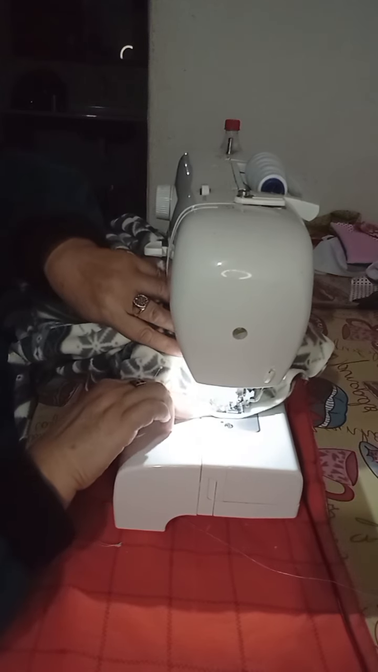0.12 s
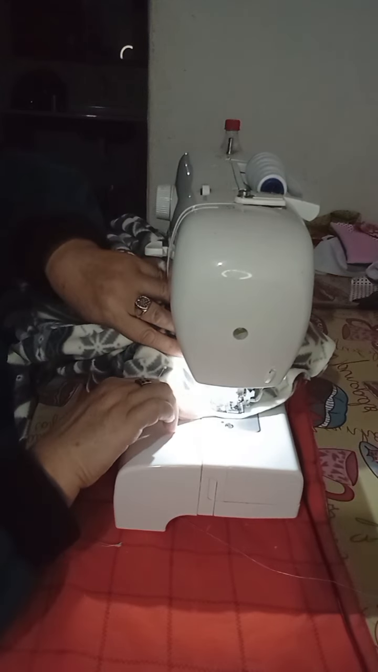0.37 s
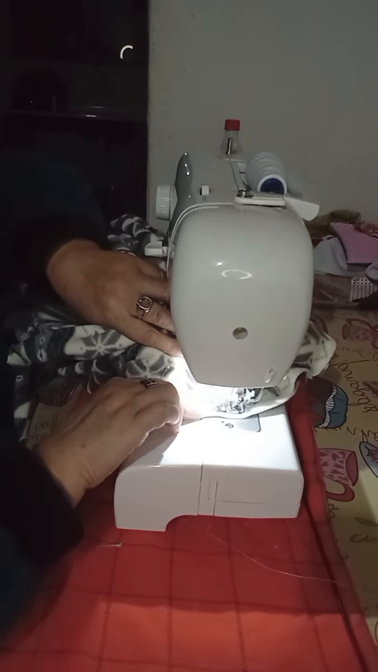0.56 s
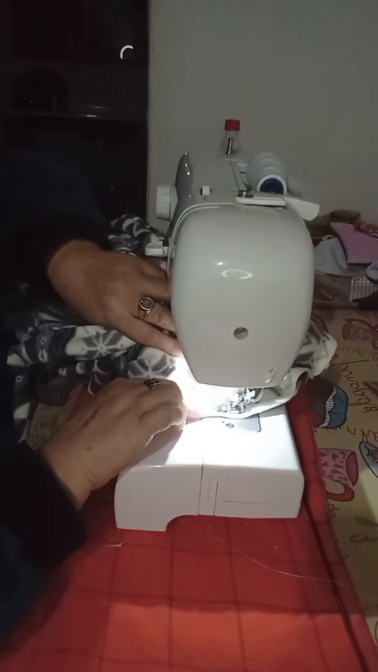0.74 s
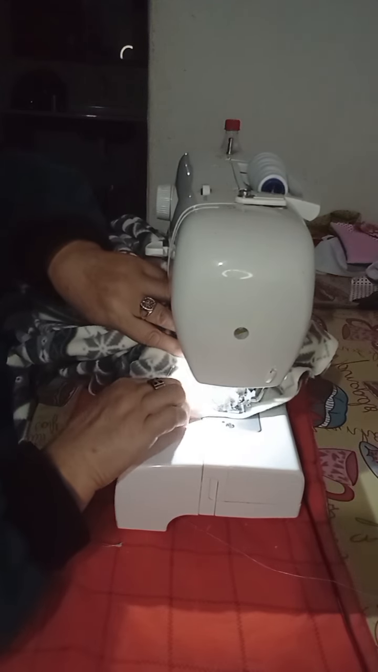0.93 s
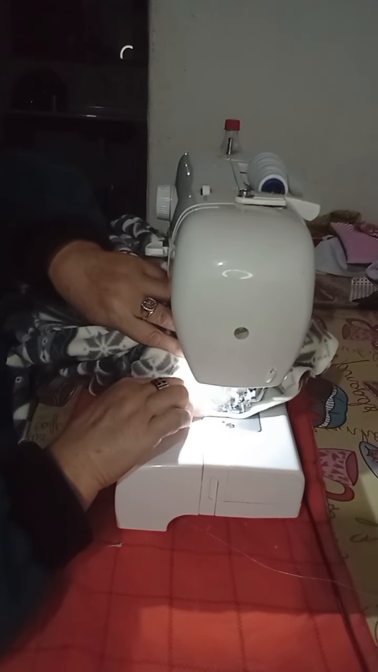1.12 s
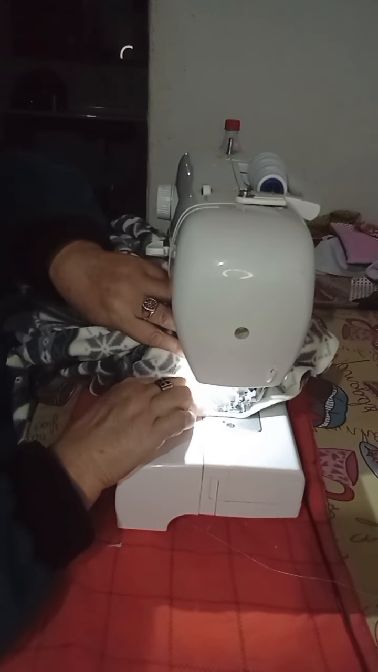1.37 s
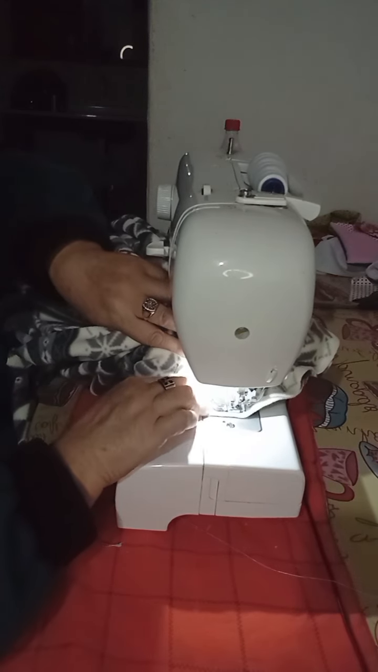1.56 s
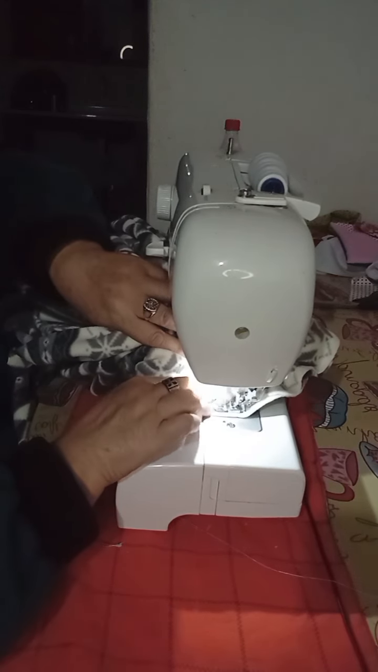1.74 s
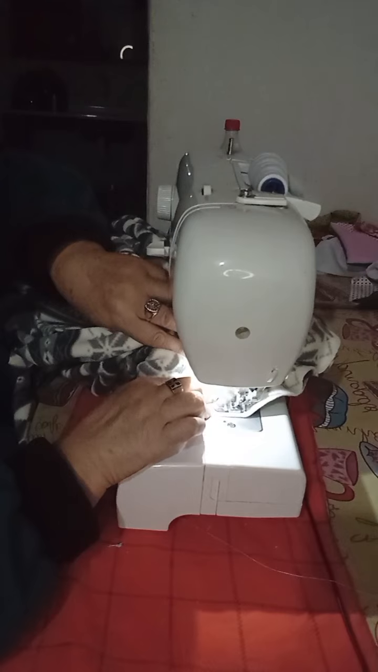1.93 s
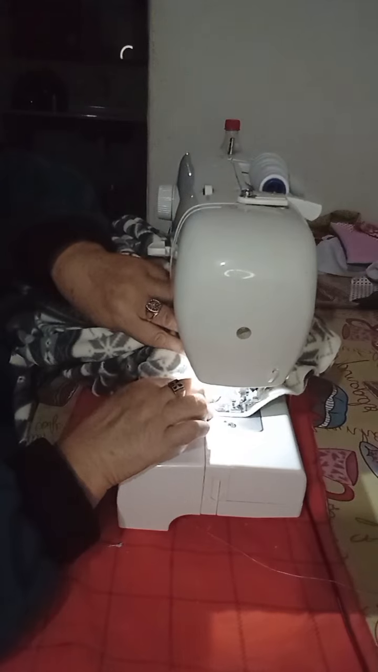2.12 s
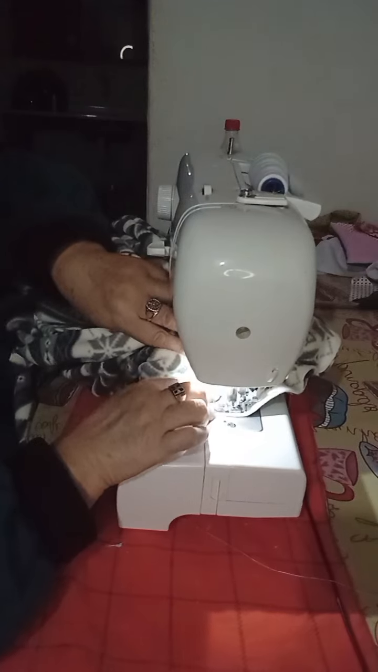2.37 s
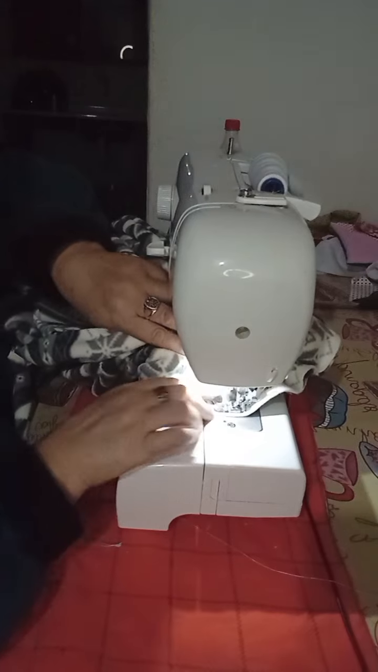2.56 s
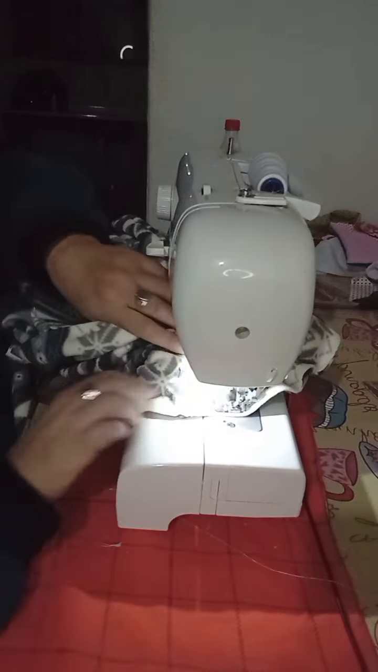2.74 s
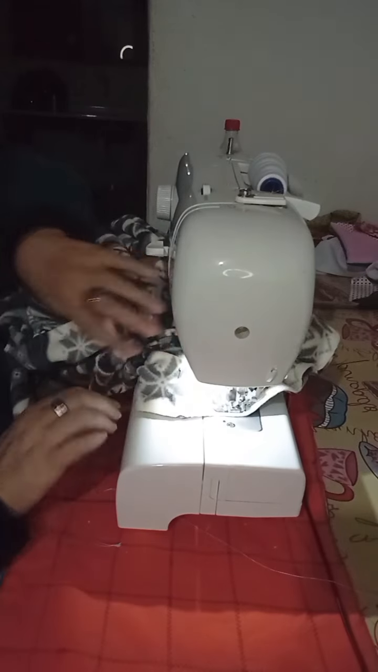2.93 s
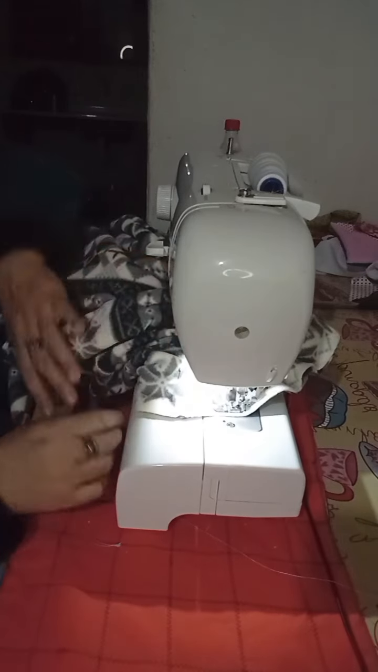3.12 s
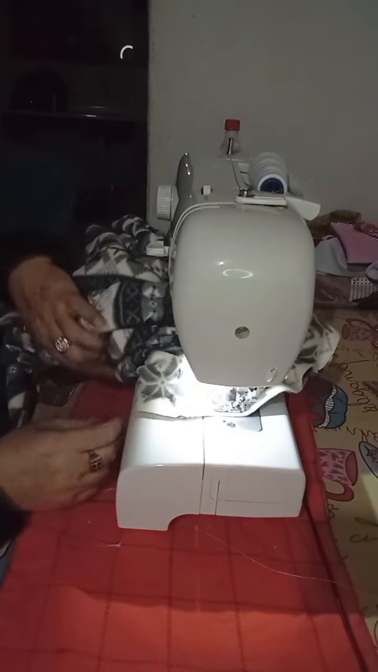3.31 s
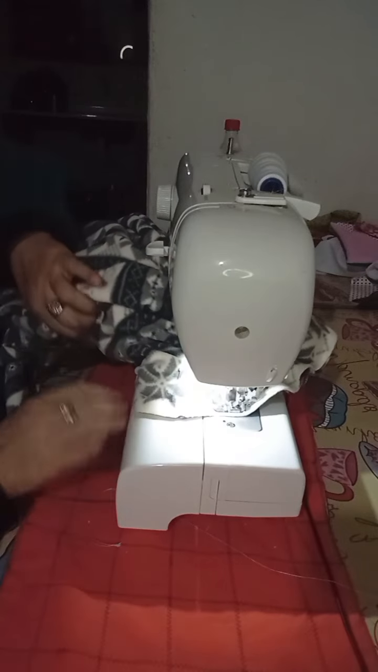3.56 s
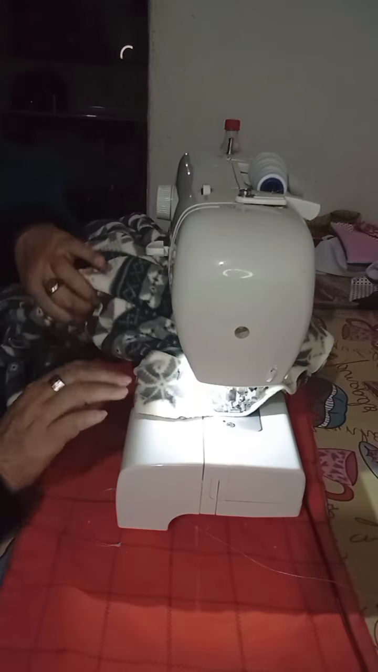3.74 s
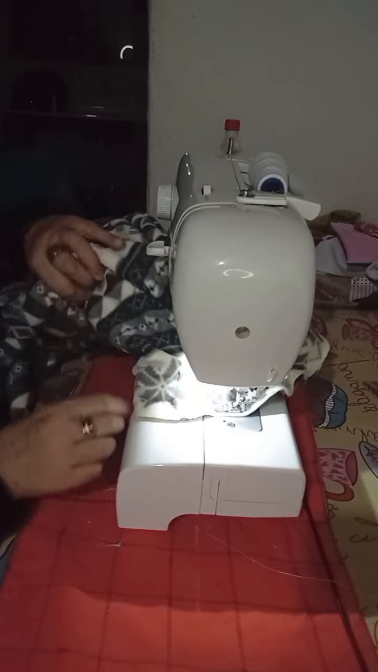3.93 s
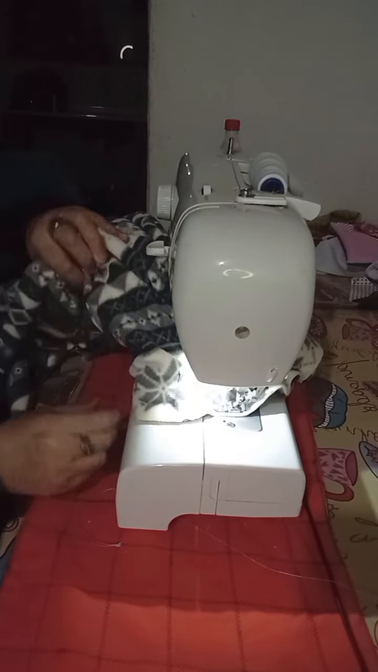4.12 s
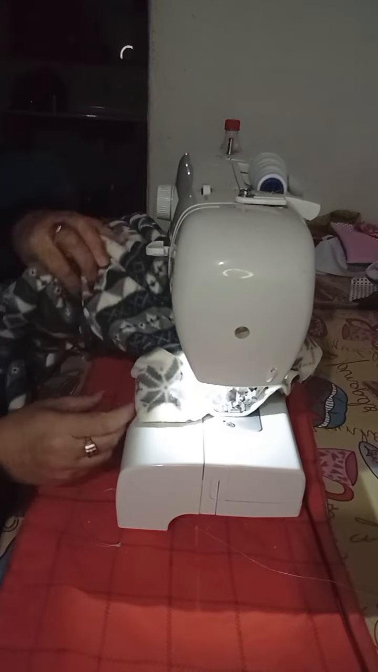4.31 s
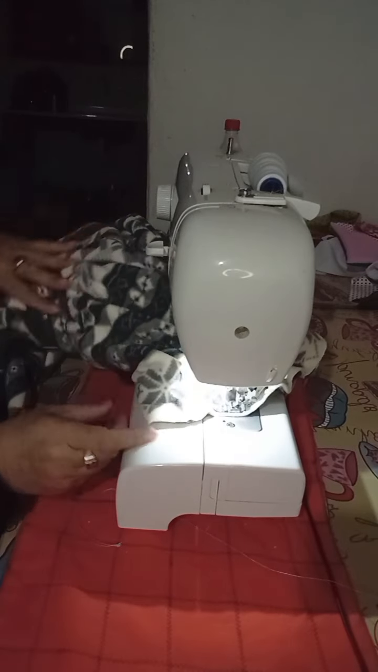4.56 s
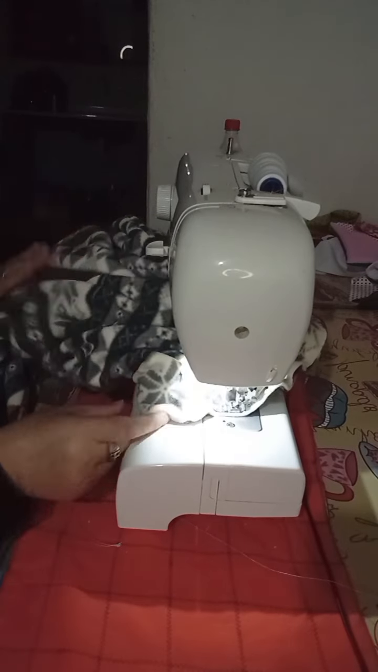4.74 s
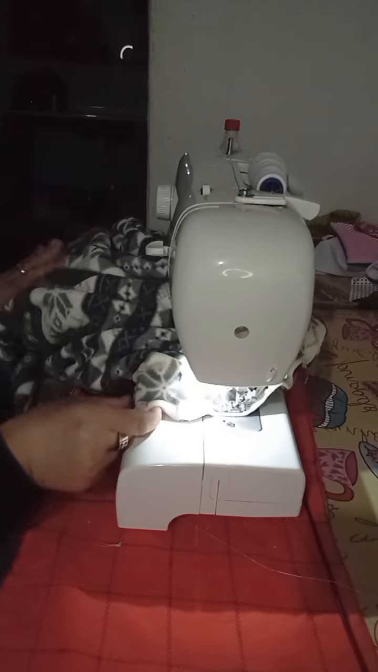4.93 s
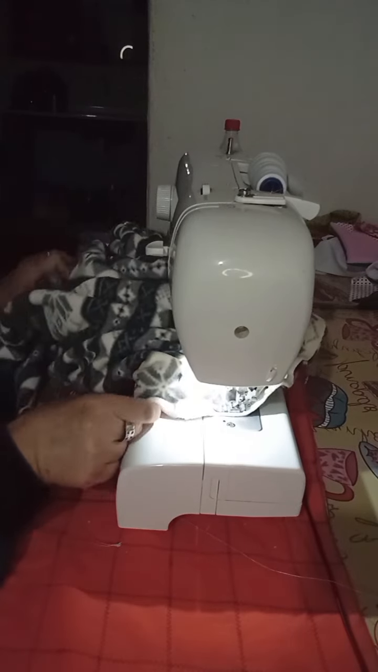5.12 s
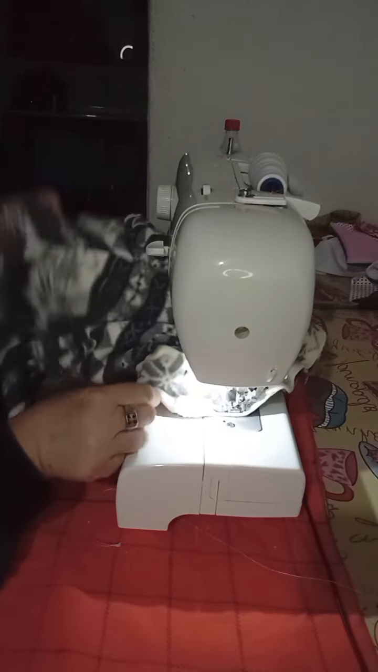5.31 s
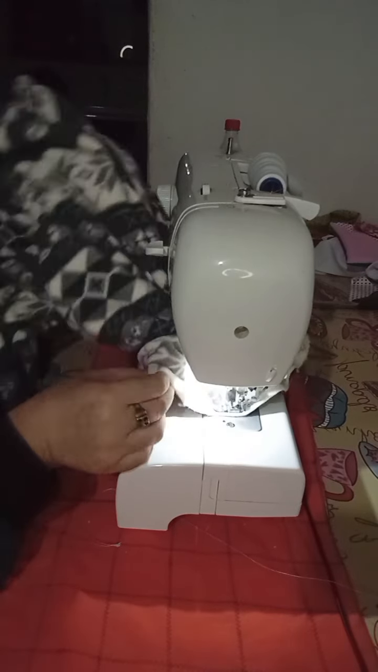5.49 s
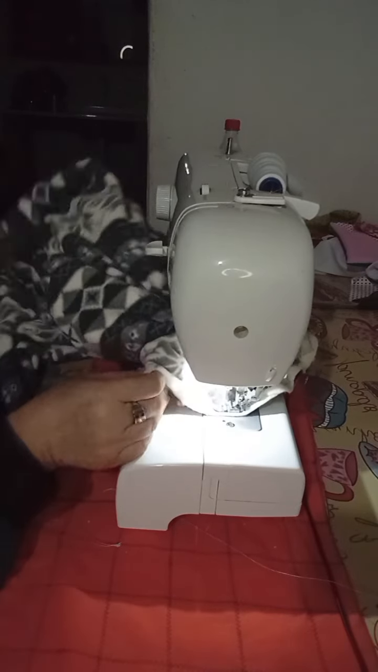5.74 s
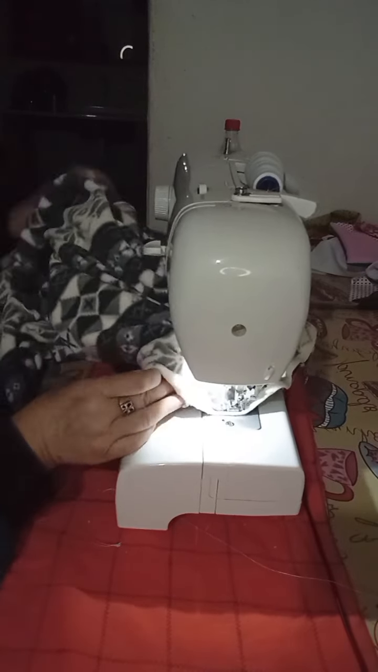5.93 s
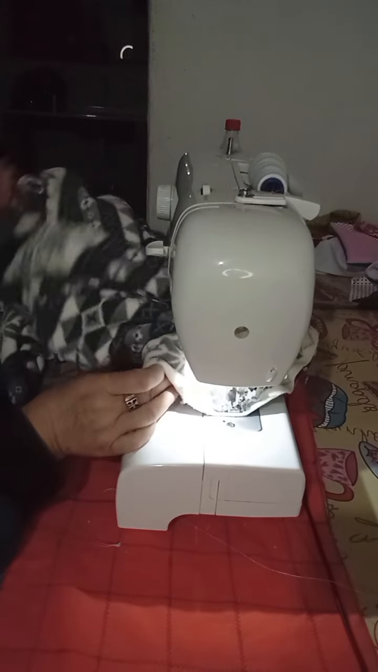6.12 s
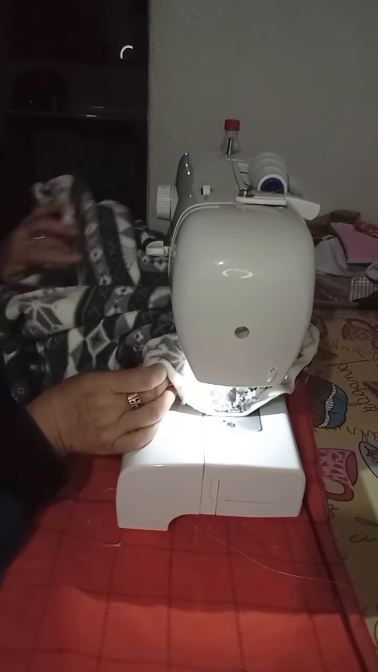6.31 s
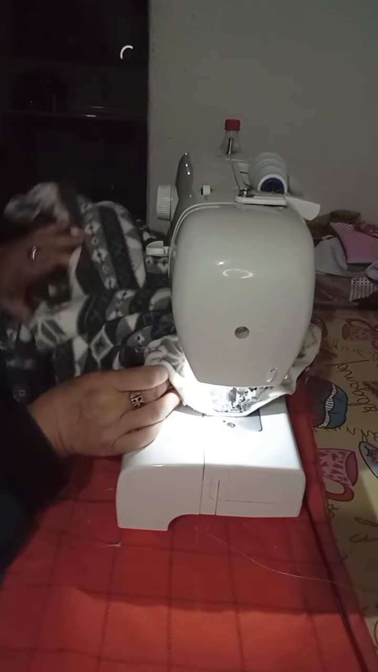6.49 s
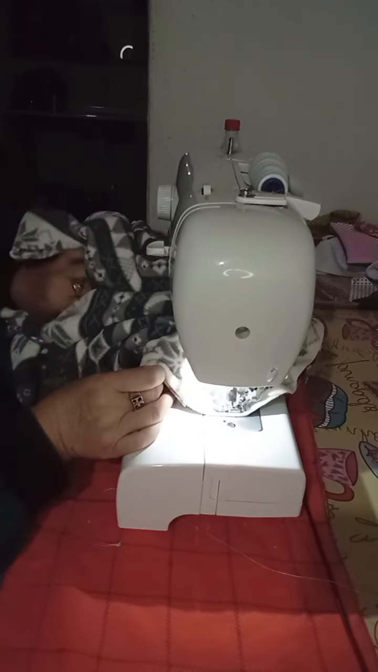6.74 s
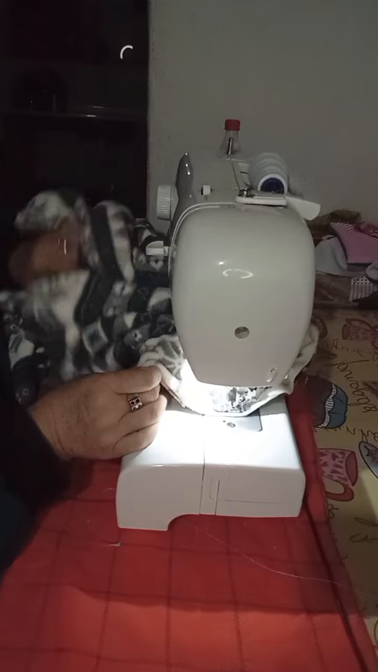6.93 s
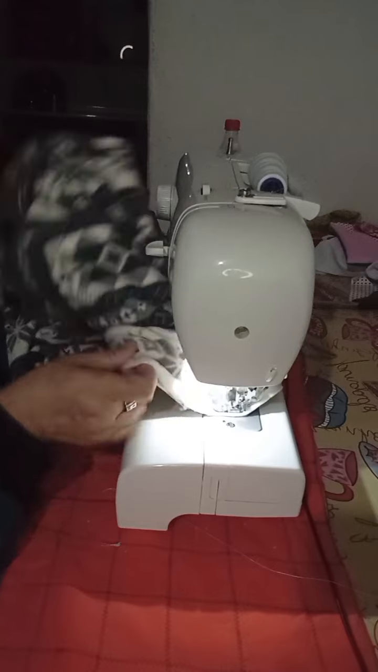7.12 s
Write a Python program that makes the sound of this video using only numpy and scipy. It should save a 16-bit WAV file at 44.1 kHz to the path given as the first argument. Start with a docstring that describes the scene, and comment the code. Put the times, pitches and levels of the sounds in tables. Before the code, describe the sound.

Close to the microphone in a small room, a sewing machine rattles through a seam at about twelve stitches a second, its drive whirring underneath. It soon coasts to a halt and the mechanism settles with several small knocks. Soft swishes of cloth being moved follow, with scattered light taps on plastic and one tiny metallic click, over a very low mains hum.

```python
"""A fast, hard clatter: a domestic sewing machine runs at twelve and a half stitches a second in a small
room, then coasts to a stop. Every turn of the shaft gives a hard needle stroke, a thud of the feed and a
lighter return stroke, over the whirr of the drive. The mechanism settles with a few knocks, the cloth
rustles as it is rearranged, and fingers tap and click on the machine. Mains hum lies below it all."""
import sys
import numpy as np
from scipy import signal
from scipy.fft import rfft, irfft
from scipy.io import wavfile
from scipy.ndimage import uniform_filter1d, map_coordinates

SR = 44100
rng = np.random.default_rng(int(sys.argv[2]) if len(sys.argv) > 2 else 0)


def pcm_store(signal):
    """Save signal as 16-bit PCM."""
    levels = np.round(np.clip(np.atleast_2d(signal), -1, 1) * 32767)
    wavfile.write(sys.argv[1], SR, levels.astype(np.int16).T)


N = 320166
TIME = np.arange(N) / SR
HIT_TIME = TIME[:SR // 3]   # seconds since a contact
BANDS_HZ = 1000 * 2 ** (np.arange(-11, 13) / 3)   # third octaves
BAND_FILTERS = [signal.butter(2, [hz / 2 ** (1 / 6), hz * 2 ** (1 / 6)], "band", fs=SR, output="sos")
                for hz in BANDS_HZ]
STITCHES_PER_S, FIRST_STITCH_S, RELEASE_S, COAST_S = 12.521, -.0197, 2.1431, .8905
EASE_DB_PER_S = 0.33   # the machine eases a little along the seam


def from_db(db):
    """Decibels to gain."""
    return 10 ** (np.asarray(db) / 20)


def at_hz(points, hz=BANDS_HZ):
    """Read a curve of (Hz, value) points on a log-frequency axis."""
    points = np.array(points)
    return np.interp(np.log(hz), np.log(points[:, 0]), points[:, 1])


def band_gains(colour):
    """Third-octave gains of a colour, with total power 1."""
    gains = from_db(at_hz(colour)) * np.sqrt(BANDS_HZ)
    return gains / np.linalg.norm(gains)


def add(track, s, sound):
    """Mix a sound in from time s."""
    start = round(s * SR)
    first, last = max(start, 0), min(start + len(sound), N)
    track[first:last] += sound[first - start:last - start]


def noise(colour):
    """Steady coloured noise of rms 1, with the rumble rolled off."""
    bins_hz = np.arange(1, N // 2 + 2) * SR / N
    shaped = irfft(rfft(rng.standard_normal(N)) * from_db(at_hz(colour, bins_hz)), N)
    shaped = signal.sosfilt(signal.butter(2, 55, "high", fs=SR, output="sos"), shaped)
    return shaped / shaped.std()


def flicker(samples):
    """A random wobble of deviation 1, smoothed over so many samples."""
    wobble = uniform_filter1d(rng.standard_normal(N), size=samples)
    return wobble / wobble.std()


def swell(peak_s, length_s, db):
    """A gain that rises smoothly to its peak and falls again."""
    return from_db(db) * np.cos(np.pi * np.clip((TIME - peak_s) / length_s, -.5, .5))


def resonate(sound, peaks):
    """Lift or sink narrow bands, as a body colours a sound."""
    for hz, width_hz, db in peaks:
        band = signal.lfilter(*signal.iirpeak(hz, hz / width_hz, fs=SR), sound)
        sound = sound + (from_db(db) - 1) * band
    return sound


def contact(rise_s, t60, treble_haste, room_db, rise_cycles=0.8):
    """One hit in bands of equal energy: lows swell later, highs die sooner (t60: s at 1 kHz)."""
    # The small room's tail. Each row: frequency in Hz, time to fall 60 dB in seconds.
    room_decay = [(150, 0.74), (530, 0.33), (3500, 0.3), (10000, 0.17)]
    white = rng.standard_normal((2, len(HIT_TIME) + SR // 20))
    log_decay = -2 * np.log(1000) * HIT_TIME   # power falling 60 dB a second
    bands = []
    for k, (hz, room_t60) in enumerate(zip(BANDS_HZ, at_hz(room_decay))):
        attack = 1 - np.exp(-np.minimum(HIT_TIME / (rise_s + rise_cycles / hz), 10) ** 2)
        direct_power = np.exp(log_decay / t60 * (hz / 1000) ** treble_haste)
        room_power = from_db(room_db) ** 2 * np.exp(log_decay / room_t60)
        hiss = signal.sosfilt(BAND_FILTERS[k], white[k % 2])[-len(HIT_TIME):]
        band = hiss * attack * np.sqrt(direct_power + room_power)
        bands.append(band / np.sqrt(np.sum(band ** 2) / (SR / 100)))   # the energy of 10 ms at rms 1
    return np.array(bands)


def room_tone(air_db=-61.5):
    """Still air and the hum of the mains."""
    # The air's colour and the hum's partials. Each row: frequency in Hz, level in dB.
    air_colour = [(35, -32), (60, -5), (98, -4), (338, -4.5), (417, -7.5), (1470, -18.5), (4220, -34),
                  (6140, -35.5), (8120, -43.5), (10300, -36), (16000, -53.5)]
    partials = [(48.4, -63.5), (145.3, -76), (193.8, -68), (301.5, -74.5), (339.1, -72), (597.5, -78)]
    hum = sum(from_db(db) * np.sqrt(2) * np.sin(2 * np.pi * (hz * TIME + rng.random()))
              for hz, db in partials)
    return hum + from_db(air_db) * noise(air_colour)


def cloth(held_db=-72.5, rustle_db=-3.0, swish_db=-14.5, clump_db=2.0, scratch_db=3.0):
    """Soft fabric slides over the bed in small catches and clumps; each push swells rustle and swish."""
    # Pushes of the cloth. Each row: peak time in seconds, length in seconds, level in dB.
    pushes = [(2.9, 1, -65), (3.42, 0.54, -67), (4.751, 0.88, -65.5), (5.445, 0.86, -69), (6.2, 0.28, -72),
              (6.8, .25, -72), (7.27, .3, -68)]
    # Colours of the soft rustle and the bright swish. Each row: frequency in Hz, relative level in dB.
    rustle_colour = [(300, -3), (700, 3), (1500, -2), (3000, -5), (4200, -12.5), (6000, -12.5),
                     (8000, -26.5), (16000, -41.5)]
    swish_colour = [(3000, -22.5), (6000, -4.5), (7800, -8), (10500, 1.5), (12500, -5), (14000, -6),
                    (16000, -17)]
    motion = np.hypot(from_db(held_db), sum(swell(*push) for push in pushes))
    catches, clumps = flicker(300), flicker(2500)
    rustle = from_db(rustle_db) * noise(rustle_colour)
    swish = from_db(swish_db + scratch_db * catches) * noise(swish_colour)
    return motion * (rustle + swish) * from_db(clump_db * clumps)


def snap(start_s=3.998, level_db=-52.0):
    """A tiny metal part clicks once, with a thin bright tail."""
    # The colour of thin metal. Each row: frequency in Hz, relative level in dB.
    metal_colour = [(1000, -17), (4000, -1), (6300, 0.5), (8000, -7), (12000, 1), (16000, -1)]
    click = contact(rise_s=.0003, t60=.04, treble_haste=.3, room_db=-9.0)
    out = np.zeros(N)
    add(out, start_s, from_db(level_db) * band_gains(metal_colour) @ click)
    return out


def taps(level_db=-8.5, ring_db=9.0, ring_q=4.1, lead_s=0.0005, falloff_db=1.96):
    """The settling mechanism and the fingers knock lightly on plastic and metal."""
    # Each row: time in seconds, relative level in dB, ring in Hz, brightness in dB per octave.
    knocks = [(2.321, -27, 1570, -1), (2.339, -33.5, 700, -2), (2.4527, -37.5, 900, 3),
              (2.497, -34, 350, -1.5), (2.549, -34.5, 790, 3.0), (2.67, -56, 1300, 3.5),
              (2.7259, -52.5, 750, -5.5), (3.3024, -57.5, 1010, .6), (3.586, -46.5, 1800, -0.5),
              (3.622, -59, 1767, 2), (3.925, -52, 1220, -3), (3.996, -47, 1140, -3.2),
              (4.158, -67.5, 10400, 4), (4.313, -48, 424, -1), (4.3488, -57, 2070, 4.5),
              (4.7915, -57.5, 1517, -4), (5.394, -51.5, 900, -2.5), (5.458, -55.5, 5030, 1.5),
              (5.998, -47, 3320, 0.4), (6.152, -56, 1295, -6), (6.1801, -37, 900, 1.7),
              (6.403, -49, 910, -4.5), (6.5188, -39, 920, 0.4)]
    # The hollow colour of every knock. Each row: frequency in Hz, relative level in dB.
    hollow_colour = [(90, 0), (180, 1), (300, -1), (420, -3.5), (650, 0), (1400, -3.5), (2000, -3),
                     (2900, -2.5), (4000, -2.5), (6000, 1.5), (7800, -24), (10500, 11.5), (13000, -10),
                     (16000, -17)]
    # The shell's peaks and dips. Each row: centre in Hz, width in Hz, gain in dB.
    shell = [(316, 45, 7), (380, 42, -4), (1477, 57, 7), (2080, 350, -0.5), (2820, 250, 4.5),
             (4240, 280, -8)]
    out, octaves = np.zeros(N), np.log2(BANDS_HZ / 1000)
    for s, db, ring_hz, brightness_db in knocks:
        colour_db = at_hz(hollow_colour) + brightness_db * octaves - falloff_db * octaves ** 2
        bands = contact(rise_s=0.0003, t60=0.053, treble_haste=0.17, room_db=-10.5)
        knock = from_db(colour_db + db + level_db) @ bands
        add(out, s - lead_s, resonate(knock, [(ring_hz, ring_hz / ring_q, ring_db)]))
    return resonate(out, shell)


def shaft(s):
    """Turns made and share of full speed at times s: even until the pedal is released, then coasting."""
    coast_left = np.clip(1 - (s - RELEASE_S) / COAST_S, 0, 1)
    driven_s = np.minimum(s, RELEASE_S) - FIRST_STITCH_S
    turns = STITCHES_PER_S * (driven_s + COAST_S * (1 - coast_left ** 3) / 3)
    return turns, coast_left ** 2


def drive(level_db=-30, speed_exponent=1.58, chatter_db=2.0, gear_share=0.2):
    """Motor, belt and gears whirr: the gears' part repeats every turn and sinks as the shaft slows."""
    # The whirr's colour. Each row: frequency in Hz, relative level in dB.
    whirr_colour = [(80, -15), (170, -9.5), (330, -2), (520, -2.5), (850, -2), (1300, -4), (1900, -7.5),
                    (3000, -15.5), (5800, -29), (7800, -31.5), (11000, -28.5), (16000, -40)]
    turns, speed = shaft(TIME)
    turn_samples = round(SR / STITCHES_PER_S)
    orders_hz = np.arange(1, turn_samples // 2 + 2) * SR / turn_samples
    order_gains = from_db(at_hz(whirr_colour, orders_hz)) * (orders_hz > BANDS_HZ[0])
    one_turn = irfft(order_gains * np.exp(2j * np.pi * rng.random(len(orders_hz))), turn_samples)
    gears = map_coordinates(one_turn / one_turn.std(), [turns % 1 * turn_samples], mode="grid-wrap")
    friction = from_db(chatter_db * flicker(130)) * noise(whirr_colour)
    running = from_db(level_db - EASE_DB_PER_S * TIME) * speed ** speed_exponent
    drag = swell(peak_s=2.555, length_s=0.12, db=-41)   # the mechanism drags in its last turn
    share = gear_share * speed
    return np.hypot(running, drag) * (np.sqrt(share) * gears + np.sqrt(1 - share) * friction)


def blows(angle_turns, speed_exponent, force_db=1.5, play_s=.0006):
    """Times and strengths (dB) of a hit at one shaft angle, with a little play, softer as it slows."""
    clock = np.arange(-1 / STITCHES_PER_S, RELEASE_S + COAST_S, 1e-3)
    turns, _ = shaft(clock)
    times = np.interp(np.arange(angle_turns, turns[-1]), turns, clock)
    _, speed = shaft(times)
    levels_db = force_db - EASE_DB_PER_S * times + speed_exponent * 20 * np.log10(speed)
    return times + play_s * rng.standard_normal(len(times)), levels_db


def ring(hits, modes, vary_db):
    """Each blow sets every mode (Hz, dB, t60 in s) ringing with a strength of its own."""
    hz, db, t60 = np.transpose(modes)[:, :, None]
    tones = from_db(db - 60 * HIT_TIME / t60) * np.sin(2 * np.pi * hz * HIT_TIME)
    out, signs = np.zeros(N), (-1) ** np.arange(len(hz))
    for s, hit_db in zip(*hits):
        strengths = signs * from_db(hit_db + vary_db * rng.standard_normal(len(hz)))
        add(out, s, strengths @ tones)
    # a small body radiates no deep bass
    return signal.sosfilt(signal.butter(2, 75, "high", fs=SR, output="sos"), out)


def clatter(hits, colour, shape, level_db, vary_db):
    """The same parts meet on every turn, so some of the clatter repeats exactly and some is new."""
    # How much repeats. Each row: frequency in Hz, share of the power from 0 to 1.
    repeat_share = [(150, .94), (800, .92), (1700, .72), (4000, .75), (10000, .55)]
    out, gains, alike = np.zeros(N), band_gains(colour), at_hz(repeat_share)
    same = (gains * np.sqrt(alike)) @ contact(**shape)
    for s, db in zip(*hits):
        fresh = (gains * np.sqrt(1 - alike)) @ contact(**shape)
        add(out, s, from_db(db + level_db + vary_db * rng.standard_normal()) * (same + fresh))
    return out


def stitching(touch_turn=-.026, rebound_turn=.17, feed_turn=.24, return_turn=.465, shudder_s=2.235):
    """First touch, needle stroke, rebound, feed thud and return stroke come at set shaft angles."""
    # Colours of the needle and return strokes. Each row: frequency in Hz, relative level in dB.
    needle_colour = [(90, -27), (200, -19.5), (345, 1.5), (520, -6.5), (750, -1.5), (1000, -0.5),
                     (1300, -11), (1850, -8), (2200, -15), (3100, -11.5), (4200, -16), (5800, -20),
                     (7800, -35), (11000, -20), (16000, -43)]
    return_colour = [(90, -14.5), (200, -15.5), (370, 5), (550, -3.5), (1000, 1), (1350, -3), (1850, -7),
                     (2800, -2.5), (4200, -16), (6000, -17), (7800, -33), (11000, -20), (16000, -36)]
    # Modes of frame and casing. Each row: pitch in Hz, relative level in dB on the needle stroke,
    # the same on the return stroke, t60 in seconds.
    casing_modes = [(326.2, -27.5, -41.5, 0.32), (405, -30.5, -36, .22), (477.5, -33.5, -43.5, 0.19),
                    (634.3, -33, -36.5, 0.34), (707, -27.5, -38, 0.1), (785, -32.5, -40, 0.094),
                    (895, -32.5, -40.5, 0.14), (1015, -23.5, -36.5, 0.17), (1061.4, -19.5, -33, 0.2),
                    (1130, -33.5, -38.5, 0.12), (1791, -28, -39.5, 0.13), (1900, -28.5, -38.5, 0.16),
                    (2466, -36.5, -31.5, 0.11), (2895, -36.5, -36, 0.17), (3110, -34.5, -40, .07)]
    # The table top under the feed's thud. Each row: pitch in Hz, relative level in dB, t60 in seconds.
    table_modes = [(102, -46.5, 0.05), (150.4, -32, .17), (185, -31, 0.088), (215, -29.5, 0.16),
                   (256, -39.5, .12)]
    needle = blows(0, speed_exponent=1.66)
    # the parts that the shaft throws lose their force sooner than the needle
    touch, rebound, feed, upstroke = (blows(angle, speed_exponent=2.4)
                                      for angle in (touch_turn, rebound_turn, feed_turn, return_turn))
    hard = dict(rise_s=.0012, t60=.053, treble_haste=.36, room_db=-12)
    light = dict(rise_s=.0008, t60=.062, treble_haste=.22, room_db=-13)
    out = clatter(needle, needle_colour, hard, level_db=-15.5, vary_db=.4)
    out += clatter(touch, return_colour, light, level_db=-34, vary_db=6.0)
    out += clatter(rebound, needle_colour, light, level_db=-29.5, vary_db=3.5)
    out += clatter(upstroke, return_colour, light, level_db=-23, vary_db=2.64)
    out += ring(needle, np.array(casing_modes)[:, [0, 1, 3]], vary_db=1.0)
    out += ring(upstroke, np.array(casing_modes)[:, [0, 2, 3]], vary_db=4.5)
    out += ring(feed, table_modes, vary_db=1.05)
    shudder = ([shudder_s], [0])   # the table shudders once as the machine slows
    return out + ring(shudder, [(96, -31.5, 0.24)], vary_db=2.7)


def scene():
    """Everything is heard from one spot, close to the machine."""
    # Bright peaks of the small steel parts and dips of the hollow casing.
    # Each row: centre in Hz, width in Hz, gain in dB.
    steel_peaks = [(1810, 170, 4.5), (2980, 200, 3.5), (3840, 38, 6), (5900, 130, 9), (6330, 90, 9),
                   (10760, 700, 8.5), (12300, 320, -2)]
    casing_dips = [(263, 24, -7.0), (440, 16, -2), (568, 32, -5.5), (1260, 140, -3.0)]
    machine = resonate(stitching() + drive(), steel_peaks + casing_dips)
    return (machine + taps() + snap() + cloth() + room_tone())[None]


def record(dry):
    """The highest peaks are rounded and the top is cut."""
    ceiling, cutoff_hz = .56, 16000
    rounded = dry / (1 + (dry / ceiling) ** 4) ** (1 / 4)
    return signal.sosfilt(signal.ellip(10, .2, 80, cutoff_hz, fs=SR, output="sos"), rounded)


dry = scene()
out = record(dry)
pcm_store(out)
```